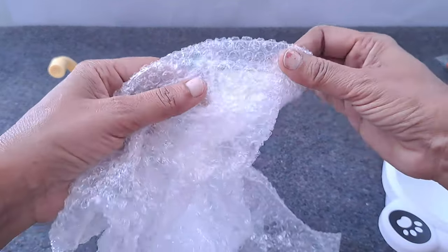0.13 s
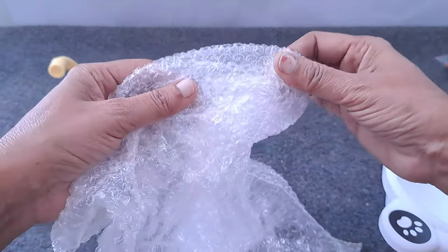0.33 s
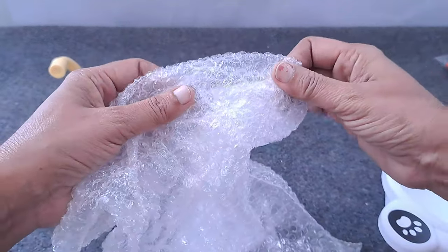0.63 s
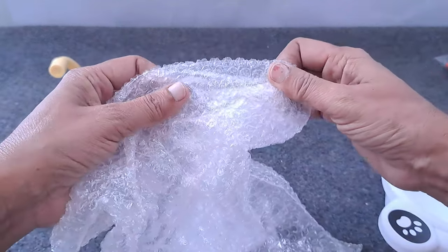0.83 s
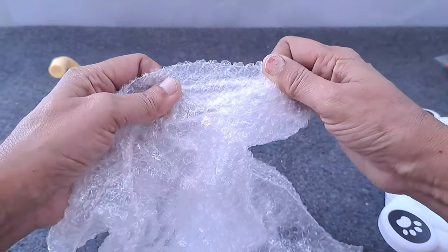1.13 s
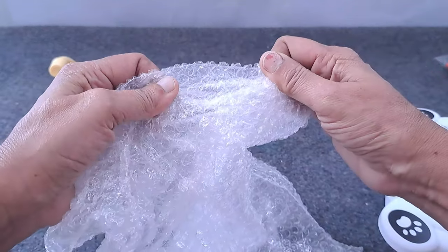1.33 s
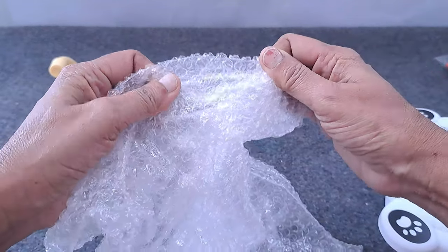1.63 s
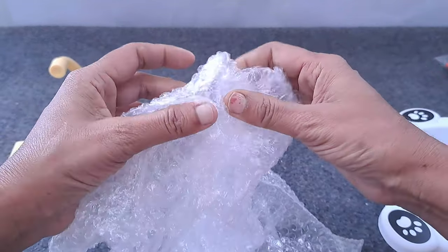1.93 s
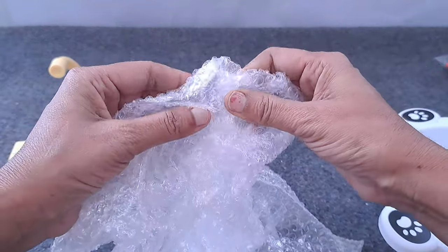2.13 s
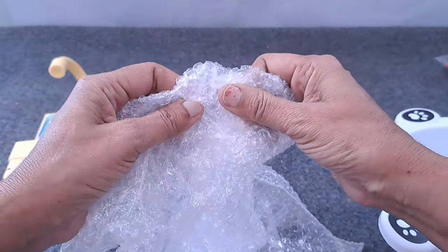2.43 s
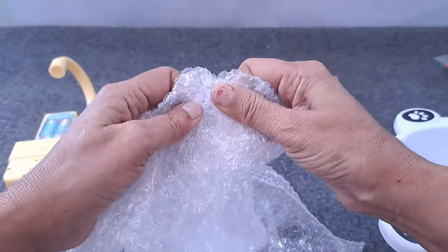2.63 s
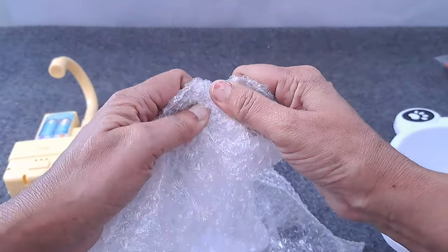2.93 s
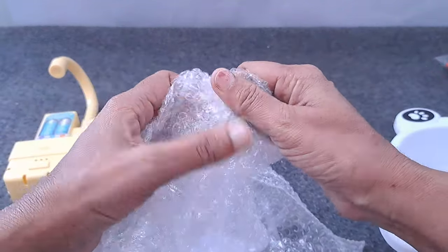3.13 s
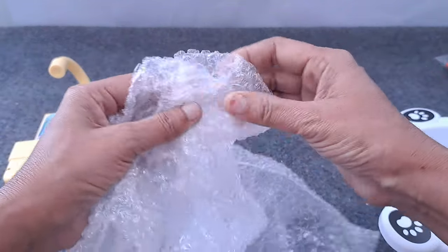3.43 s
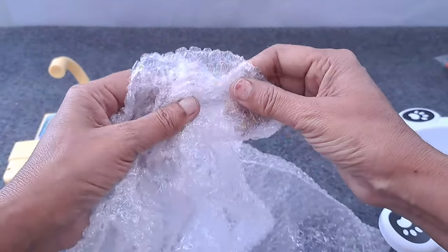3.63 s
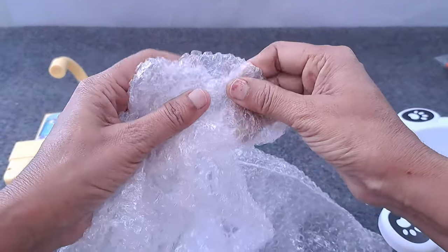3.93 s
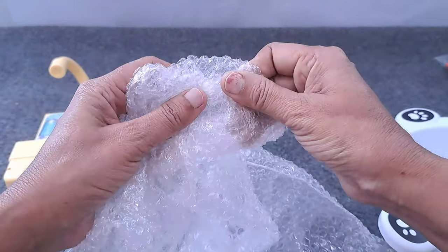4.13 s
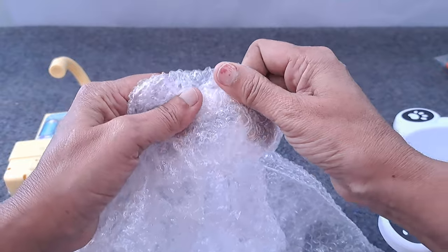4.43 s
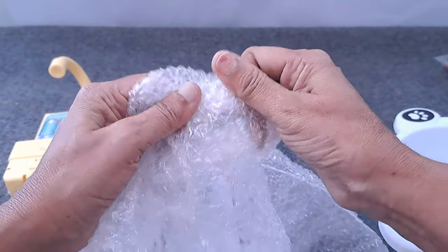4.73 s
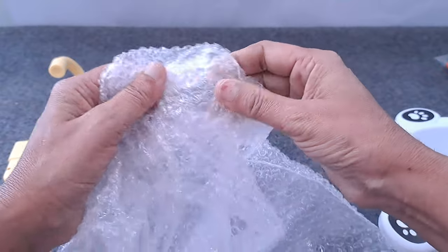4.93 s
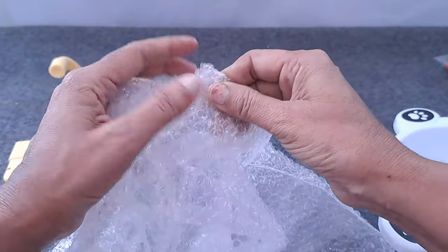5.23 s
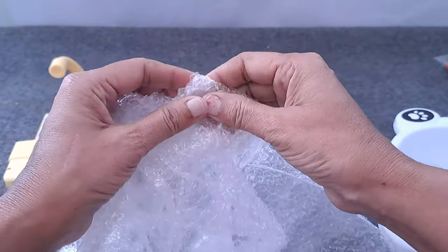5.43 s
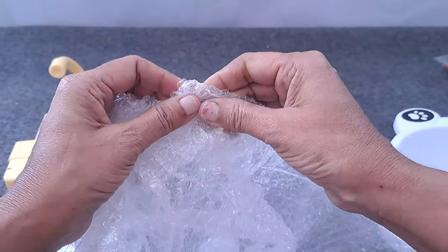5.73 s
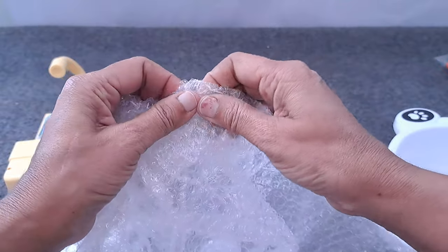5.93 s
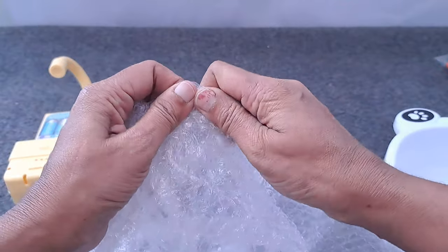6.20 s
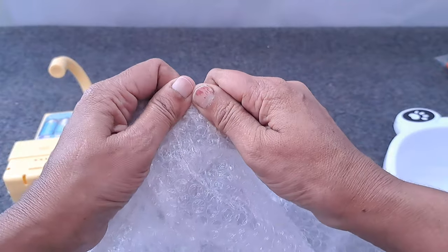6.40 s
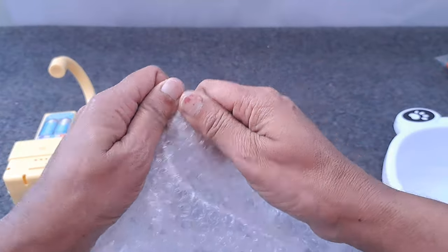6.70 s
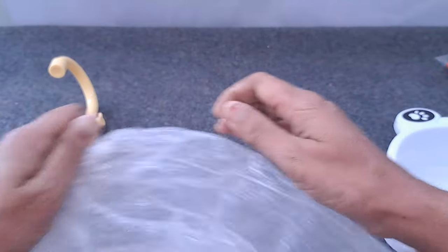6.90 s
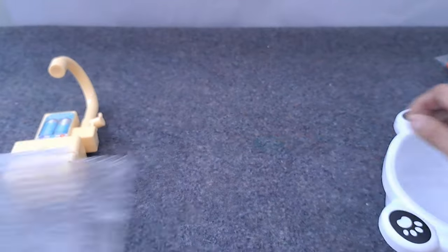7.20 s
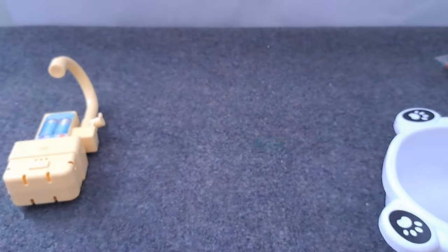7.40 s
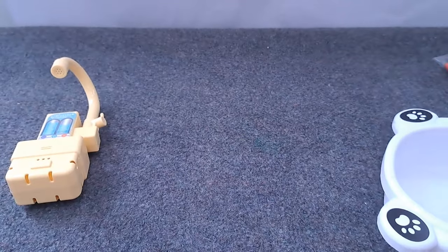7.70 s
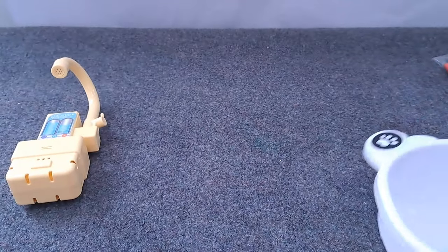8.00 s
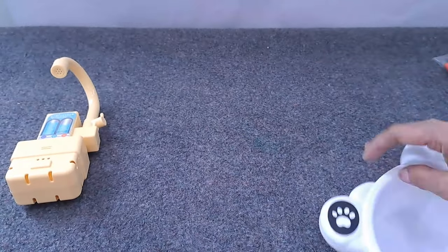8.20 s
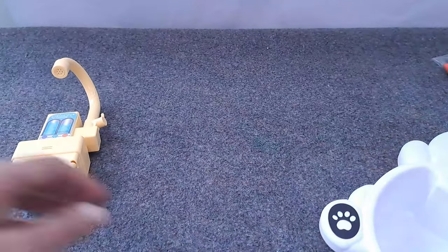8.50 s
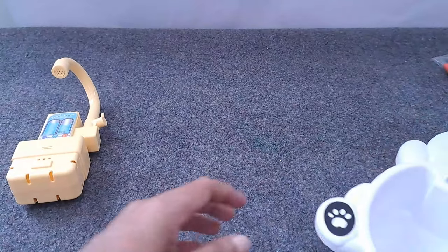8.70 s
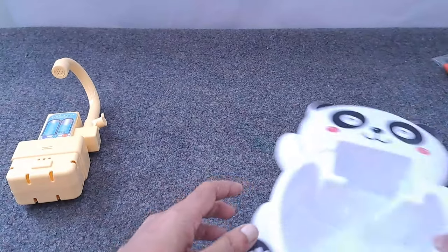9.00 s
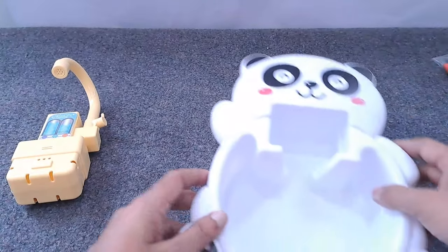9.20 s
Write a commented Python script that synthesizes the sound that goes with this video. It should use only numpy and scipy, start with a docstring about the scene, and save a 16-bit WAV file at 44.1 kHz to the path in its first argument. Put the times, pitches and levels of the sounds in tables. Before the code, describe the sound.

Bubble wrap popped in sharp, uneven clusters close up, with crinkling film between them, then a hollow plastic toy knocks and scrapes on carpet.

```python
"""In a small bare room, two hands knead a sheet of bubble wrap close to the microphones.
Bubbles burst in four volleys and a last close pair: short bursts of filtered noise that ring in the room.
The film rustles (noise and tiny clicks that swell and die away) and its creases tick.
At the end a hollow plastic toy knocks (decaying tones) and scrapes over carpet (coloured noise).
Below it all lie a low steady rumble of noise and a faint, wavering hum."""
import sys
import numpy as np
from scipy import signal
from scipy.io import wavfile

SR = 44100
rng = np.random.default_rng(int(sys.argv[2]) if len(sys.argv) > 2 else 0)


def generate_wav(sig):
    """Save sig (samples, or channels by samples) to the path in sys.argv[1] as 16-bit PCM at SR."""
    pcm = np.round(np.clip(np.atleast_2d(sig).T, -1, 1) * 32767).astype(np.int16)
    wavfile.write(sys.argv[1], SR, pcm)


N = 412335
TIME = np.arange(N) / SR  # seconds
CUTOFF_HZ = 16000  # upper limit of the treble
# hiss of sliding film and of carpet pile, relative strength: f/Hz, level/dB per Hz
HISS = [(1200, -14), (2300, -6), (2700, -3), (3400, -6), (4000, -3.5), (4900, .5), (6500, .5), (7900, 2.5),
        (9800, -3), (12500, -1.5), (16000, -6.5)]


def pops(scatter_s=.008):
    """Each bubble sends a burst straight to the microphones and a scattered one to the walls."""
    # bursting bubbles, levels before the final mix: t/s, level/dB (rms as if 1 ms long), pitch/Hz,
    # crack of tearing film/dB re burst, hollow of the hands/dB re burst, left-right/dB,
    # lag of the right microphone/ms, sound sent to the room/dB re pop
    pop_table = [(0.9527, -12.5, 3980, -9, -11, -4, 0.05, -5), (1.0076, -19.0, 1870, 4, -10, -3, 0.05, -3),
                 (1.0165, -19.0, 5950, -10, -12, -3, 0.05, -2), (1.0394, -14.5, 2140, 1, -9, -4, 0.0, -7),
                 (1.1538, -12.5, 3560, -10, -6, -1, 0.05, -7), (1.1981, -10.0, 3090, -13, -16, -6, 0.0, -5),
                 (1.264, -17.5, 7840, 15, -3, 0, 0.18, -3), (1.2915, -26.0, 4920, 11, -11, 4, 0.09, 4),
                 (1.3115, -21.0, 4400, -4, -8, -4, 0.16, 0), (1.3792, -18.0, 3250, 0, -4, -4, 0.16, -6),
                 (2.57, -23.0, 4810, -3, -1, 3, 0.07, -8), (2.5728, -23.5, 3030, -2, -9, -6, 0.07, -3),
                 (2.7128, -24.5, 2540, -2, -6, 0, 0.09, 2), (2.7269, -12.5, 4200, 4, -12, 0, 0.09, -11),
                 (2.7298, -18.5, 3510, 0, -18, -5, 0.07, -5), (2.8437, -15.5, 2350, 4, -6, -2, 0.09, -4),
                 (2.8466, -16.5, 2420, 11, -4, -9, 0.07, -10), (2.8822, -17.5, 4750, 1, -9, -2, 0.09, -2),
                 (4.2664, -17.0, 3660, 2, -9, -1, 0.11, -8), (4.3646, -14.0, 5270, -15, -12, -6, 0.16, 1),
                 (4.3673, -14.0, 2570, 3, -21, -6, 0.09, -3), (4.3827, -13.5, 3710, -16, -10, -4, 0.11, -9),
                 (4.3885, -18.5, 4040, -3, -6, -3, 0.14, -9), (4.4457, -11.5, 3410, -4, -8, -3, 0.05, -6),
                 (4.5131, -18.0, 3360, 0, 0, -2, 0.14, -4), (4.5826, -24.5, 2570, 4, -18, -2, 0.05, -6),
                 (6.0258, -18.0, 2840, -3, -12, -3, 0.11, 0), (6.0298, -11.0, 4390, -17, -16, 0, 0.18, -10),
                 (6.0994, -17.0, 3630, -5, -9, -1, 0.11, 1), (6.1054, -14.5, 4080, -19, -14, -2, 0.07, -9),
                 (6.1822, -13.0, 4860, -4, -17, 2, 0.18, -13), (6.1878, -20.0, 3800, -5, -7, 0, 0.11, 3),
                 (6.221, -14.5, 2620, -5, -8, -4, 0.11, -7), (6.2885, -12, 2900, -26, -18, -1, 0.02, -7),
                 (6.3762, -13.5, 6140, 6, -20, -3, 0.14, -2), (6.3812, -17.0, 3670, 1, -20, -1, 0.18, 0),
                 (6.5134, -10.5, 3360, -22, -15, 0, 0.02, -8), (6.6987, -12.5, 5510, -8, -25, -3, 0.14, -5),
                 (6.7654, -22.0, 6050, -1, -14, -4, 0.16, 0), (6.7725, -24.5, 6640, -12, -23, -4, 0.11, -8),
                 (7.1937, -17.5, 4900, -14, -13, 1, 0.2, -2), (7.1967, -21, 2500, -18, -9, 0, 0.2, -5)]
    direct, to_room = np.zeros((2, N)), np.zeros((2, N))
    t = np.arange(SR // 30) / SR

    def scattered_click():
        """Each part of a pop leaves for the walls as one click at its own moment."""
        started = t >= rng.uniform(.0002, scatter_s)
        return np.diff(started, prepend=False).astype(float)

    for s, db, hz, crack_db, hollow_db, pan_db, lag_ms, room_db in pop_table:
        size = from_db(db) * np.sqrt(SR / 1000)  # spreads the level over 1 ms
        pop = size * bubble(lambda: rupture(t), hz, crack_db, hollow_db)
        echo_source = size * from_db(room_db) * bubble(scattered_click, hz, crack_db, hollow_db)
        add(to_room, s, echo_source)
        pop[1] = np.roll(pop[1], round(lag_ms * SR / 1000))
        add(direct, s, pop * panned(pan_db))
    return direct, to_room


def bubble(drive, hz, crack_db, hollow_db, width=1.5, low_hz=1100, crack_hz=7000,
           hollow_hz=1130, body_hz=380, body_db=-13.5, body_floor_db=-27.0):
    """Air escapes at the bubble's pitch, film cracks, cupped hands add hollow and body; energy 1."""
    # a bubble that gives way softly has little crack and a dull top
    top_hz = hz * np.interp(crack_db, [-24, -12], [1.9, 3.6])
    air = cut(drive(), [hz / width, hz * width], "band", order=1)
    air = cut(air, low_hz, "high", order=3)
    air = cut(air, top_hz, "low", order=1)
    crack = cut(drive(), [crack_hz, CUTOFF_HZ], "band", order=1)
    hollow = cut(drive(), [hollow_hz / 1.3, hollow_hz * 1.3], "band")
    body = cut(drive(), [body_hz / 1.4, body_hz * 1.4], "band")
    # the body follows the hollow but never vanishes
    body_gain = from_db(hollow_db + body_db) + from_db(body_floor_db)
    pop = energy_one(air) + from_db(crack_db) * energy_one(crack)
    pop = pop + from_db(hollow_db) * energy_one(hollow) + body_gain * energy_one(body)
    return energy_one(cut(pop, CUTOFF_HZ, "low", order=4))


def rupture(t, snap_s=.0004, flap_s=.004, flap_db=-9.0, shock_db=14.5,
            bounce_s=.0008, bounce_db=-9.0, own=.9):
    """A sudden pressure jolt, its bounce off the hands, and torn film flapping for a few ms."""
    shared_noise = rng.standard_normal(len(t))
    own_noise = own * rng.standard_normal((2, len(t)))  # differs left and right
    noise = rms_one(shared_noise + own_noise)
    burst = noise * (np.exp(-t / snap_s) + from_db(flap_db) * np.exp(-t / flap_s))
    shock = from_db(shock_db) * rng.choice([-1, 1])  # air is first pushed or pulled
    burst[:, :2] = [0, shock]
    bounce_at = (bounce_s * SR * rng.uniform(.5, 1.4, 2)).astype(int)  # one sample number per side
    burst[[0, 1], bounce_at] += shock * from_db(bounce_db)
    return burst


def puff(buffet_db=-18.0, buffet_hz=180, kick_db=14.0, kick_s=.0006):
    """Escaping air kicks the microphone's diaphragm, shoves it to and fro and buffets it."""
    # one jet of air from a bubble: t/s, level/dB, f/Hz, length/s, left-right/dB
    jet = (1.264, -30, 55, .033, 12)
    s, db, hz, length, pan_db = jet
    out, t = np.zeros((2, N)), np.arange(int(length * SR)) / SR
    buffet = rms_one(cut(rng.standard_normal(len(t)), buffet_hz, "low"))
    swelling = np.sqrt(np.abs(np.sin(np.pi * t / length)))
    shove = swelling * (from_db(buffet_db) * buffet - np.sin(2 * np.pi * hz * t))
    kick = from_db(kick_db) * np.exp(-t / kick_s)
    add(out, s, from_db(db) * (shove + kick) * panned(pan_db))
    return out


def rustle(hiss_gain_db=-0.9, crackle_db=-6.0, flutter_db=1.3, pan_db=-2.7):
    """Film sliding on film hisses and crackles; the flexing sheet adds a lower rustle."""
    # rustle of the film; the rows at 2.89 and 6.63 s thicken the dying echoes of the pops;
    # levels before the gains below: t/s, length/s, hiss of film/dB, rustle of flexing plastic/dB
    film_swells = [(-0.07, 0.25, -45.0, -52.0), (0.22, 0.17, -53.5, -53.5), (0.49, 0.29, -54.5, -59.5),
                   (0.86, 0.06, -51.5, -61.0), (1.66, 0.11, -48.0, -55.5), (1.81, 0.19, -51.0, -57.0),
                   (2.16, 0.09, -55.0, -66.0), (2.43, 0.26, -52.5, -65.5), (2.89, 0.19, -50.5, -52.5),
                   (3.15, 0.11, -44.5, -51.5), (3.28, 0.17, -52.0, -56.0), (3.45, 0.07, -44.0, -58.5),
                   (3.66, 0.19, -48.5, -55.0), (3.85, 0.14, -48.5, -59.5), (4.03, 0.22, -50.5, -60.5),
                   (4.56, 0.12, -54.5, -54.0), (4.76, 0.09, -44.5, -54.0), (4.95, 0.09, -45.5, -53.0),
                   (5.28, 0.06, -48.0, -54.5), (5.41, 0.13, -51.0, -66.5), (5.6, 0.19, -52.0, -71.0),
                   (5.88, 0.12, -54.0, -63.0), (6.63, 0.28, -48.0, -50.0), (6.97, 0.08, -55.0, -57.0),
                   (7.13, 0.06, -53, -58), (7.57, 0.05, -47.0, -56.0), (7.7, 0.07, -55.5, -60.0)]
    # rustle of flexing plastic, relative strength: f/Hz, level/dB per Hz
    flex_spectrum = [(80, -6), (140, 2.5), (300, 3.5), (430, 4.5), (600, -4), (850, -1.5), (1200, 0),
                     (1700, -1), (2400, -5), (5000, -18)]
    sliding, flexing = movements(film_swells, attack_s=.073, sag_db_per_s=7, release_db_per_s=80)

    # between the swells the sheet stirs faintly, until it settles
    stir_hiss_db, stir_flex_db, settled_s, settle_db_per_s = -61, -67, 8.1, 130
    stir = from_db(-settle_db_per_s * np.maximum(TIME - settled_s, 0))
    sliding = np.hypot(sliding, from_db(stir_hiss_db) * stir)
    flexing = np.hypot(flexing, from_db(stir_flex_db) * stir)

    grip_db = flutter_db * drift(25)  # both layers flutter together
    crackle = rms_one(cut(grains(per_s=800, spread_db=4.4), [3200, 14000], "band", order=1))
    film = coloured(HISS) + from_db(crackle_db) * crackle
    hiss = sliding * from_db(hiss_gain_db + grip_db) * film
    flex = flexing * from_db(grip_db) * coloured(flex_spectrum)
    return hiss * panned(pan_db) + flex * panned(pan_db / 2)


def grains(per_s, spread_db):
    """Tiny slips of the film make clicks of very uneven size, now denser, now sparser; rms 1."""
    sizes = from_db(spread_db * np.minimum(rng.exponential(1, N), 4)) * rng.choice([-1, 1], N)
    chance = per_s * from_db(4 * drift(15)) / SR
    clicks = sizes * (rng.random(N) < chance)
    return rms_one(clicks * (1 + .5 * rng.standard_normal((2, N))))  # strength differs left and right


def creases(low_hz=3500, tick_s=.0005, gain_db=2.5):
    """A crease flips over with a tick: bright noise that dies within a few ms."""
    # creases flipping over: t/s, peak level before the gain/dB
    flips = [(0.5566, -34), (0.6923, -39), (1.6661, -37), (3.1398, -37), (3.5972, -35), (3.6167, -31),
             (3.8412, -35), (3.932, -31), (3.9709, -35), (4.0821, -35), (4.8065, -34), (5.0948, -36),
             (5.3268, -34), (5.4779, -37), (5.6366, -36), (5.7887, -35), (7.5972, -39), (7.6222, -36)]
    out, t = np.zeros((2, N)), np.arange(SR // 100) / SR
    for s, db in flips:
        noise = rng.standard_normal((2, len(t))) * np.exp(-t / tick_s)
        tick = cut(noise, [low_hz, CUTOFF_HZ], "band")
        add(out, s + .001, from_db(db + gain_db) * tick / np.abs(tick).max())
    return out


def toy(tick_s=.0009, tick_db=-6.0, shell_db=-7.0):
    """Each knock gives a tick and makes the hollow shell ring in tones of its own, fresh in strength."""
    # light knocks on the toy: t/s, level of the whole knock/dB
    knocks = [(8.005, -35), (8.052, -40), (8.078, -22), (8.085, -27), (8.139, -35), (8.71, -43),
              (9.175, -49)]
    # tones of the shell: f/Hz, typical relative level/dB, time to fall by 60 dB/s
    shell_modes = [(735, -14, .05), (905, -10, .05), (1135, -6, .04), (1755, -13, .03), (2120, -13, .025),
                   (4580, -12, .012), (7900, -9, .006)]
    out, t = np.zeros((2, N)), np.arange(SR // 10) / SR
    for s, db in knocks:
        shell = np.zeros(len(t))
        for hz, level, t60 in shell_modes:
            ringing = from_db(level + rng.normal(0, 2) - 60 * t / t60)
            shell += ringing * np.sin(2 * np.pi * hz * t) * rng.choice([-1, 1])
        tick = from_db(tick_db) * rng.standard_normal((2, len(t))) * np.exp(-t / tick_s)
        add(out, s, from_db(db) * (from_db(shell_db) * shell + tick) * panned(-5))
    return out


def scuff(gain_db=-1.0, judder_db=1.3, pan_db=-4.0):
    """The toy's underside drags through carpet pile: a juddering scrape and hiss of noise."""
    # shoves over the carpet, levels before the gain: t/s, length/s, scrape of shell/dB, hiss of pile/dB
    shoves = [(8.0, .016, -47, -45), (8.065, .08, -43, -42), (8.705, .31, -53.5, -66),
              (9.105, .025, -64, -67)]
    # scrape on the carpet, relative strength: f/Hz, level/dB per Hz
    carpet = [(300, -7), (550, -8), (760, -3), (1120, 2), (1450, -4), (2500, -5), (3100, -15), (4000, -13),
              (8000, -22), (15000, -30)]
    scrape, hiss = movements(shoves, attack_s=.01, sag_db_per_s=14, release_db_per_s=130)
    judder = from_db(gain_db + judder_db * drift(30))
    return judder * (scrape * coloured(carpet) + hiss * coloured(HISS)) * panned(pan_db)


def movements(rows, attack_s, sag_db_per_s, release_db_per_s):
    """Gains of a table's two layers of sound; overlapping rows add in power."""
    power = np.array([swell(s, length, attack_s, sag_db_per_s, release_db_per_s) ** 2
                      for s, length, *_ in rows])
    layer_gains = from_db(np.array(rows)[:, 2:])
    return np.sqrt(layer_gains.T ** 2 @ power)


def swell(start, length, attack_s, sag_db_per_s, release_db_per_s):
    """Gain of one row: it rises, sags while it lasts, then dies away."""
    t = np.maximum(TIME - start, 0)
    sag_db = sag_db_per_s * np.minimum(t, length)
    release_db = release_db_per_s * np.clip(t - length, 0, 1)
    return np.minimum(t / attack_s, 1) * from_db(-sag_db - release_db)


def room(feed, build_s=.002, early_db=-5.5, early_s=.018, pan_db=-2.3):
    """Sound bounces off the walls: scattered early echoes melt into a diffuse, dying tail."""
    # how long the room rings: f/Hz, time to fall by 60 dB/s
    ring_times = [(200, .45), (1060, .42), (2800, .46), (7300, .45), (15000, .38)]
    # colour of the tail, relative strength: f/Hz, level/dB
    tail_colour = [(150, 0), (420, 2), (700, -2.5), (1200, 0), (2400, -.5), (3400, -2.5), (4700, 0),
                   (7000, 1.5), (9500, -1), (15000, -1)]
    t = np.arange(int(.7 * SR)) / SR
    tail = np.zeros((2, len(t)))
    for hz, band in stereo_bands(len(t)):
        tail += from_db(at_hz(tail_colour, hz) - 60 * t / at_hz(ring_times, hz)) * band
    struck = rng.random((2, len(t))) < 700 / SR  # about 700 echoes a second
    echoes = rng.standard_normal((2, len(t))) * struck * np.exp(-t / early_s)
    response = energy_one(tail) + from_db(early_db) * energy_one(echoes)
    response = energy_one(response * (1 - np.exp(-t / build_s)))
    return signal.fftconvolve(feed, response, axes=1)[:, :N] * panned(pan_db)


def background(rumble_db=-58.0, waver_db=3.5, stray=.45):
    """Low rumble of noise with a wavering hum, slightly out of step at the two microphones."""
    # rumble, relative strength: f/Hz, level/dB per Hz
    rumble_spectrum = [(25, -18), (40, -6), (60, -2), (75, -2), (100, -7), (140, -10), (200, -3), (290, -1),
                       (400, -3), (590, -17), (750, -18), (950, -17.5), (1200, -22), (2200, -27),
                       (3500, -38), (15000, -44)]
    # hum tones: f/Hz, rms level about which each wavers/dB
    hum_tones = [(58, -71), (72, -68), (437, -72)]
    hum = np.zeros((2, N))
    for hz, db in hum_tones:
        loudness = from_db(db + waver_db * drift(1.5)) * np.sqrt(2)  # rms to peak
        side_phase = stray * np.array([drift(6), drift(6)])
        hum += loudness * np.sin(2 * np.pi * hz * TIME + drift(4) + side_phase)
    return from_db(rumble_db) * coloured(rumble_spectrum) + hum


def coloured(spectrum):
    """Diffuse noise with a given spectrum, rms 1."""
    return rms_one(sum(from_db(at_hz(spectrum, hz)) * band for hz, band in stereo_bands(N)))


def stereo_bands(size):
    """Third-octave bands of noise, much alike on both sides only towards the bass."""
    # left-right likeness of diffuse sound: f/Hz, correlation (1 = the same, 0 = unrelated)
    likeness = [(40, .7), (130, .78), (290, .9), (640, .62), (1410, .25), (3100, -.05), (15000, 0)]
    edges = 22 * 2 ** np.arange(0, 9.7, 1 / 3)
    white = rng.standard_normal((2, 2, size))  # neighbouring bands take turns with two noises
    for k, band in enumerate(zip(edges, edges[1:])):
        mid, side = cut(white[k % 2], band, "band")
        hz = np.sqrt(band[0] * band[1])
        alike = np.clip(at_hz(likeness, hz), -1, 1)
        yield hz, np.sqrt(1 + alike) * mid + np.sqrt(1 - alike) * side * [[1], [-1]]


def drift(rate):
    """Slow random wandering of spread 1; a higher rate (Hz) wanders faster."""
    r = np.exp(-40 * np.pi * rate / SR)  # computed at every 20th sample only
    noise = rng.standard_normal(N // 20 + 4002)
    slow = signal.lfilter([1], [1, -2 * r, r * r], noise)[4000:]  # skip the filter's start
    return np.interp(np.arange(N) / 20, np.arange(len(slow)), rms_one(slow))


def from_db(db):
    """Decibels to gain."""
    return 10 ** (np.asarray(db) / 20)


def rms_one(x):
    """Scale to rms 1."""
    return x / np.sqrt(np.mean(x ** 2) + 1e-20)


def energy_one(x):
    """Scale to energy 1 in each channel."""
    return x / np.sqrt(np.sum(x ** 2, axis=-1, keepdims=True) + 1e-20)


def panned(db):
    """Left and right gains of constant power; a positive value is louder on the left."""
    return rms_one(from_db([[db / 2], [-db / 2]]))


def at_hz(points, hz):
    """Read a table of (f/Hz, value) between its points on a log-frequency axis."""
    table = np.array(points)
    return np.interp(np.log(hz), np.log(table[:, 0]), table[:, 1])


def cut(x, hz, kind, order=2):
    """Butterworth filter: keeps the low, high or band part of a sound."""
    safe_hz = np.clip(hz, 10, .47 * SR)
    return signal.sosfilt(signal.butter(order, safe_hz, kind, fs=SR, output="sos"), x)


def add(out, s, sound):
    """Mix a sound in at time s (seconds)."""
    i = round(s * SR)
    out[:, i:i + sound.shape[-1]] += sound[..., :N - i]


def scene(pop_db=1.0, room_db=-1.2, small_room_db=-5.0):
    """All layers together; pops, crease ticks and toy knocks also ring in the room."""
    direct, to_room = pops()
    small = creases() + toy()
    wet = room(from_db(room_db) * to_room + from_db(small_room_db) * small)
    near = from_db(pop_db) * direct + small + rustle() + scuff() + puff()
    return near + wet + background()


def record(dry):
    """The highest peaks are rounded and the treble above the cutoff is removed."""
    rounded = .98 * np.tanh(dry / .98)
    return signal.sosfilt(signal.ellip(10, .2, 80, CUTOFF_HZ, fs=SR, output="sos"), rounded)


dry = scene()
out = record(dry)
generate_wav(out)
```